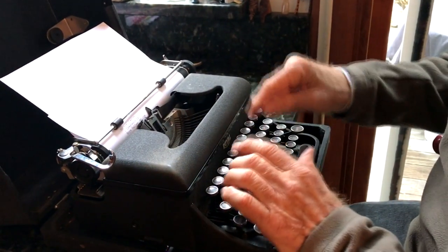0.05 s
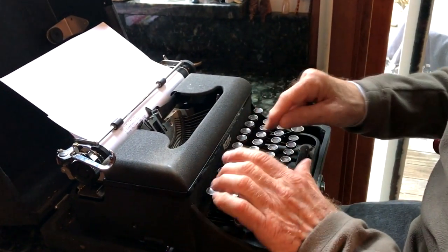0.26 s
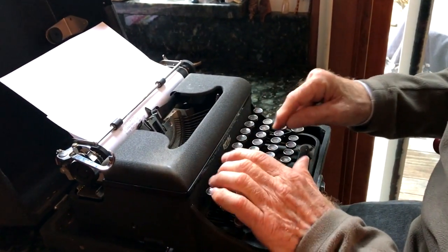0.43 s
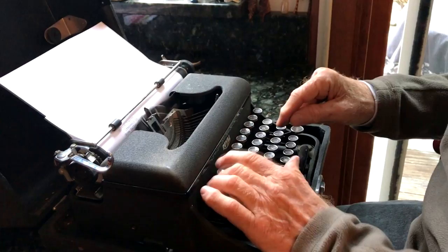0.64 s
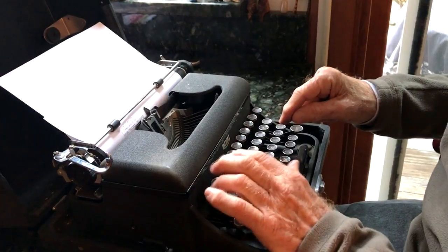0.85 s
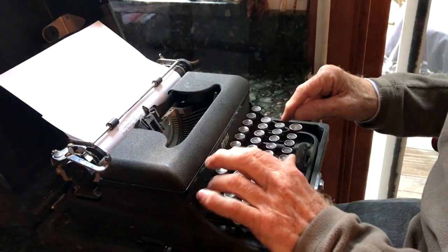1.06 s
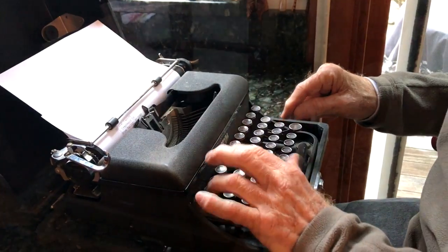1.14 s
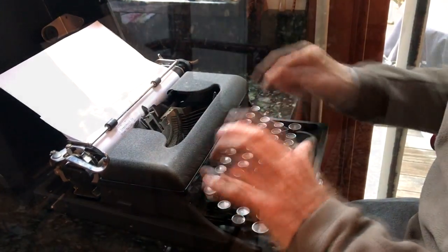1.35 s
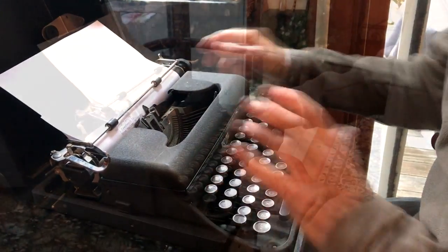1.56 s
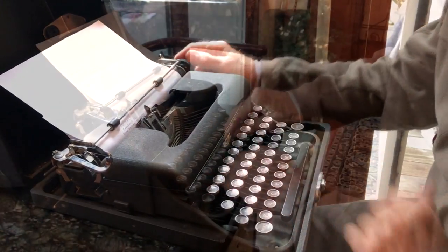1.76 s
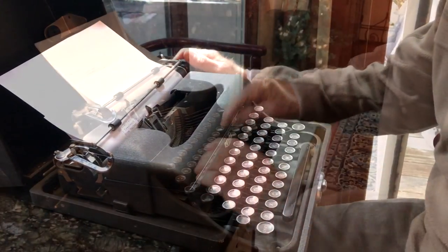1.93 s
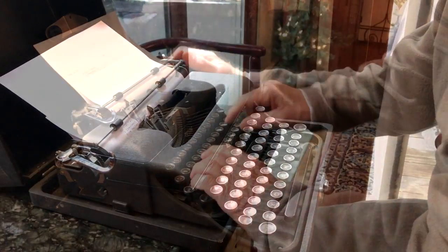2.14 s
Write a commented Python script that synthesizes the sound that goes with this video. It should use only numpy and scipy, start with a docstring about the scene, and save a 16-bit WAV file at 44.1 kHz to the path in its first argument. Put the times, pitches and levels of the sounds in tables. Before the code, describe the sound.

Typing on a manual typewriter, sharp clacks in a fairly even run with one brief pause.

```python
"""Manual typewriter on a stone counter

One microphone close to the machine in a small room: two short runs of letters, a space between them.
For each letter a key lever knocks, the escapement trips, the type slug cracks on the platen and the
frame rattles; then the typebar drops back and the carriage bumps to its next stop.
A faint high whine stands over the room's hush."""
import sys
import numpy as np
from scipy import signal
from scipy.fft import rfft, irfft
from scipy.io import wavfile
from scipy.ndimage import uniform_filter1d

SR = 44100
rng = np.random.default_rng(int(sys.argv[2]) if len(sys.argv) > 2 else 0)


def transcribe(signal):
    """Save signal, clipped to [-1, 1], as a 16-bit WAV file at the path in sys.argv[1]."""
    frames = np.atleast_2d(signal).T
    limited = np.clip(frames, -1, 1)
    pcm = np.round(limited * 32767).astype(np.int16)
    wavfile.write(sys.argv[1], SR, pcm)


N = 97020

# Type slugs hitting the platen. Each row: start in seconds, then crack, frame and escapement in dB.
STRIKES = [(-.034, -1, -35.5, -37), (.2055, -5.5, -35.5, -37.5), (0.3632, -5.5, -35, -38.5),
           (.4916, -6, -37.5, -35.5), (.6149, -7.5, -34, -42.5), (0.7598, -6, -35, -38.5),
           (.8899, -6, -35, -39.5), (1.2067, -6.5, -33.5, -43), (1.3727, -8.5, -36, -42),
           (1.5077, -6, -34, -40), (1.6256, -9.5, -35.5, -47), (1.7783, -7, -34, -42),
           (1.9119, -8.5, -36, -39)]


def type_strikes():
    """The escapement trips, the slug cracks on the platen and chatters on the paper, the frame rattles."""
    # Modes of the platen and of thin steel parts that ring on.
    # Each row: frequency in Hz, relative level in dB, t60 in seconds.
    platen_modes = [(1595, -14, 0.016), (1952, -16.5, 0.013), (2770, -27.5, .012), (3180, -3.5, 0.005),
                    (3644, -14, 0.0082), (4100, -13.5, 0.0099), (4598, -6.5, 0.0078), (5000, -11, .012),
                    (5770, -6.5, 0.0064), (6085, -14, 0.011), (6464, -9, 0.006), (6360, -17, 0.006),
                    (8280, -10, 0.0038), (11350, -16.5, .004)]
    steel_modes = [(2940, -9.5, 0.091), (2880, 15, 0.089), (3770, 1, 0.21), (4800, -11.5, 0.1),
                   (5030, -5, .14), (5200, -1.5, 0.14), (4950, 4, 0.27), (5960, -11.5, 0.2), (6240, 5, .12),
                   (6780, 11.5, .12), (6900, 2, .14)]
    # Spectra of the crack, the chatter and the frame. Each row: frequency in Hz, relative level in dB.
    crack_spectrum = [(150, -22.5), (900, -18.5), (1500, -11), (2500, 3), (7000, 3), (9000, -2),
                      (12000, -4), (14000, -4.5), (16000, -4)]
    chatter_spectrum = [(200, -28.5), (1000, -16), (2000, -1.5), (3000, -0.5), (6800, -0.5), (8000, -15),
                        (12000, -20), (16000, -38.5)]
    frame_spectrum = [(60, -28), (200, -1.5), (330, -10), (520, -14), (880, -8.5), (1020, -14),
                      (1250, -9.5), (1650, -10.5), (2100, -10.5), (2900, -5.5), (4000, -3), (5400, -1),
                      (6800, -4.5), (8000, -11), (10000, -19.5), (12500, -23.5), (16000, -32.5)]
    chatter_db, steel_db = -18.5, -33.5  # relative to the crack
    escapement_lead_s = 0.0087
    likeness = 0.59  # share of the frame's rattle that is the same on every strike
    usual_contacts = contacts()
    out = np.zeros(N)
    for at, crack_db, frame_db, escapement_db in STRIKES:
        blow = ring(platen_modes, spread=0.003) * swell(0.00012)  # the ribbon cushions the slug
        crack = colour(blow, crack_spectrum)
        shaking = np.sqrt(likeness) * usual_contacts + np.sqrt(1 - likeness) * contacts()
        chatter = rattle(shaking, chatter_spectrum, attack_s=0.0026, t60=0.017)
        frame = rattle(shaking, frame_spectrum, attack_s=0.0026, t60=0.2)
        steel = ring(steel_modes, spread=0.003)
        escapement = rattle(contacts(), frame_spectrum, attack_s=0.0018, t60=0.22)
        add(out, at, -undb(crack_db) * crack / np.abs(crack).max())
        add(out, at, undb(crack_db + chatter_db) * chatter)
        add(out, at, undb(crack_db + steel_db) * steel)
        add(out, at, undb(frame_db) * frame)
        add(out, at - escapement_lead_s, undb(escapement_db) * escapement)
    return out


def keys():
    """Fingers drive down the key levers and the space bar, which knock and shake their linkages."""
    # Key presses. Each row: start in seconds, rattle in dB, knock in dB, knock pitch in Hz.
    presses = [(.163, -45.5, -39.5, 238), (0.319, -48.5, -55, 256), (0.345, -42.5, -42, 299),
               (0.482, -50, -69, 236), (0.582, -46.5, -50, 241), (.718, -45, -37.5, 225),
               (0.848, -45.5, -41, 243), (1.151, -50, -34.5, 327), (1.166, -43, -37.5, 233),
               (1.328, -53, -49, 240), (1.355, -44.5, -52, 244), (1.476, -46, -45.5, 214),
               (1.614, -45.5, -42.5, 226), (1.736, -43, -46, 240), (1.879, -49, -43.5, 220)]
    # Modes of a key lever. Each row: ratio to its pitch, relative level in dB, t60 in seconds.
    lever_modes = [(.78, -15, 0.084), (0.999, 19, 0.086), (1.219, 13, 0.095), (1.5, -8, .05)]
    # The space bar going down and bottoming out. Each row: start in seconds, rattle in dB, thud in dB.
    space_blows = [(1.013, -47.5, -45), (1.036, -42.5, -23.5)]
    # Modes of the space bar. Each row: frequency in Hz, relative level in dB, t60 in seconds.
    space_bar_modes = [(146.5, -16, 0.14), (216, -8, 0.1), (260, -2, 0.056), (296, -3, 0.15),
                       (360, -11, 0.042), (420, -8, 0.054), (564, -16, 0.099)]
    # Spectrum of the linkages. Each row: frequency in Hz, relative level in dB.
    linkage_spectrum = [(100, -48.5), (300, 12), (550, -4), (1000, 2), (2100, -1.5), (3500, -1),
                        (5700, 0.5), (7000, -5), (8500, -9.5), (12000, -17), (16000, -35.5)]
    slack_s = 0.004  # the lever's slack is taken up before it knocks
    out = np.zeros(N)
    for at, rattle_db, knock_db, pitch_hz in presses:
        modes = [(ratio * pitch_hz, db, t60) for ratio, db, t60 in lever_modes]
        knock = ring(modes) * swell(0.0027)
        linkage = rattle(contacts(), linkage_spectrum, attack_s=0.009, t60=0.26)
        add(out, at, undb(rattle_db) * linkage)
        add(out, at + slack_s, undb(knock_db) * knock)
    for at, rattle_db, thud_db in space_blows:
        thud = ring(space_bar_modes) * swell(0.003)
        linkage = rattle(contacts(), linkage_spectrum, attack_s=0.014, t60=0.2)
        add(out, at, undb(rattle_db) * linkage + undb(thud_db) * thud)
    return out


def typebars():
    """Each bar drops back into the basket with a clatter and a short, rough ring."""
    # Bars landing on their rest. Each row: start in seconds, clatter in dB, ring in dB.
    landings = [(0.024, -48.5, -59), (0.083, -51.5, -54), (0.261, -45.5, -35), (0.427, -48.5, -48),
                (0.55, -47.5, -50), (.663, -44, -55), (.815, -46, -40.5), (0.945, -47.5, -57),
                (1.267, -50.5, -60), (1.433, -50, -62), (1.561, -48.5, -51.5), (1.674, -47, -54),
                (1.833, -48.5, -41), (1.964, -46.5, -31), (1.977, -58, -37), (2.037, -57, -65),
                (2.069, -54.5, -64.5)]
    # Modes of a typebar. Each row: frequency in Hz, relative level in dB, t60 in seconds.
    bar_modes = [(2150, -8, .05), (2910, -10.5, 0.045), (3660, -3.5, 0.086), (3640, -2.5, 0.075),
                 (3920, -15.5, .06), (5410, -11.5, .04)]
    # Spectrum of the clatter. Each row: frequency in Hz, relative level in dB.
    clatter_spectrum = [(100, 2), (300, 9), (550, -3.5), (880, 4.5), (1020, -1), (1300, 0.5), (2400, -4.5),
                        (3700, -7.5), (6000, -8), (8500, -15), (12000, -22), (16000, -34.5)]
    out = np.zeros(N)
    for at, clatter_db, ring_db in landings:
        ping = ring(bar_modes) * flutter(depth_db=6, size=90) * swell(0.00039)
        clatter = rattle(contacts(), clatter_spectrum, attack_s=0.0039, t60=0.18)
        add(out, at, undb(clatter_db) * clatter + undb(ring_db) * ping)
    return out


def carriage():
    """After every letter the carriage steps on, bumps its stop and rebounds."""
    # Modes of the machine's body. Each row: frequency in Hz, relative level in dB, t60 in seconds.
    body_modes = [(86.7, 1, 0.24), (110, -2.5, .2), (188, -8, 0.2), (226, -8, 0.22), (298, -6.5, .16),
                  (914, -6.5, 0.13), (1340, -18.5, 0.083)]
    stop_lag_s, stop_db = 0.063, -42.5
    rebound_s, rebound_db = 0.036, -10.5  # relative to the first bump
    out = np.zeros(N)
    for at, *_ in STRIKES:
        for lag_s, db in ((stop_lag_s, stop_db), (stop_lag_s + rebound_s, stop_db + rebound_db)):
            add(out, at + lag_s, undb(db) * ring(body_modes) * swell(0.0084))
    return out


def room(direct):
    """Echoes from the counter and near walls reach the microphone, then a short diffuse tail."""
    # Reflections off nearby surfaces. Each row: delay in seconds, level in dB against the direct sound.
    echoes = [(.0017, -22), (.0031, -35), (.0082, -22.5)]
    tail_delay_s, tail_db = 0.014, -16
    out = direct.copy()
    for delay_s, db in echoes:
        add(out, delay_s, undb(db) * direct)
    tail = rng.standard_normal(SR // 2) * fade(t60=0.11)
    add(out, tail_delay_s, undb(tail_db) * signal.fftconvolve(direct, tail / np.linalg.norm(tail)))
    return out


def hush():
    """Room tone: a steady, low noise."""
    # Spectrum of the quiet room. Each row: frequency in Hz, relative level in dB.
    hush_spectrum = [(25, -10), (50, -6.5), (85, 5.5), (200, -6.5), (400, -16), (1000, -28), (3000, -31.5),
                     (8000, -36.5), (16000, -44)]
    return undb(-65) * colour(rng.standard_normal(N), hush_spectrum, size=4096)


def whine():
    """A thin electrical tone at the top of hearing."""
    pitch_hz, rms_db = 15077, -76
    return undb(rms_db) * np.sqrt(2) * np.sin(2 * np.pi * pitch_hz * np.arange(N) / SR)


def ring(modes, spread=0.015):
    """Struck modes, each detuned on every blow by a random share of about `spread`; peak 1."""
    ringing = np.zeros(SR // 2)
    for hz, db, t60 in modes:
        detuned_hz = hz * (1 + spread * rng.standard_normal())
        ringing += undb(db) * fade(t60) * np.sin(2 * np.pi * detuned_hz * clock())
    return ringing / np.abs(ringing).max()


def rattle(drive, spectrum, attack_s, t60):
    """Contacts of loose metal parts that swell and die away."""
    return colour(drive * swell(attack_s) * fade(t60), spectrum)


def contacts():
    """Uneven stream of tiny metal contacts."""
    return rng.standard_normal(SR // 2) * flutter(depth_db=2.5, size=24)


def flutter(depth_db, size):
    """Smoothed random gain of unit power, drawn anew every `size` samples."""
    steps = undb(depth_db * rng.standard_normal(SR // 2 // size + 1))
    gain = uniform_filter1d(np.repeat(steps, size), size // 2)[:SR // 2]
    return gain / np.sqrt(np.mean(gain ** 2))


def colour(x, spectrum, size=1024):
    """Causal filter of unit power that follows (Hz, dB) points."""
    hz, db = np.array(spectrum, float).T
    bins_hz = np.arange(size // 2 + 1) * SR / size
    gain = undb(np.interp(np.log(bins_hz + 1), np.log(hz), db))
    cepstrum = irfft(np.log(gain))
    cepstrum[1:size // 2] *= 2  # folded to minimum phase, so nothing sounds ahead of a blow
    cepstrum[size // 2 + 1:] = 0
    response = irfft(np.exp(rfft(cepstrum)))
    return signal.fftconvolve(x, response / np.linalg.norm(response))[:len(x)]


def swell(attack_s):
    """A blow builds linearly for `attack_s` seconds, then holds."""
    return np.minimum(clock() / attack_s, 1)


def fade(t60):
    """Exponential decay, 60 dB in `t60` seconds."""
    return np.exp(-np.log(1000) * clock() / t60)


def clock():
    """Time since a blow, over half a second."""
    return np.arange(SR // 2) / SR


def undb(db):
    """Decibels to gain."""
    return 10 ** (np.asarray(db) / 20)


def add(out, at_s, sound):
    """Mix a sound in at a time."""
    start = int(round(at_s * SR))
    lo, hi = max(start, 0), min(start + len(sound), N)
    if hi > lo:
        out[lo:hi] += sound[lo - start:hi - start]


def scene():
    """The machine in its room, over the hush and the whine, in mono."""
    background = hush() + whine()
    machine = type_strikes() + keys() + typebars() + carriage()
    return (room(machine) + background)[None]


def record(dry):
    """The recorder cuts the top with a steep low-pass."""
    top_hz = 15600
    return signal.sosfilt(signal.ellip(8, .2, 70, top_hz, fs=SR, output="sos"), dry)


dry = scene()
out = record(dry)
transcribe(out)
```